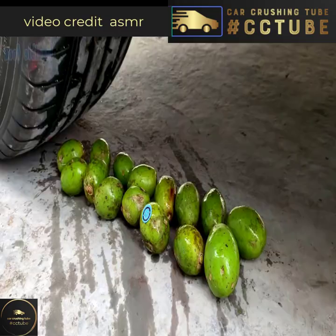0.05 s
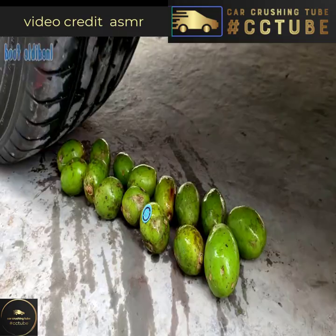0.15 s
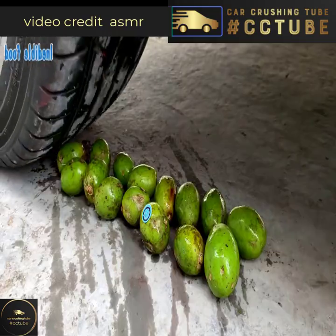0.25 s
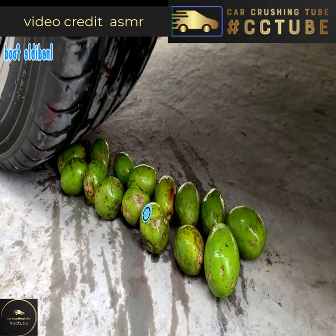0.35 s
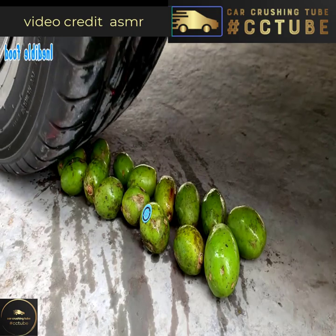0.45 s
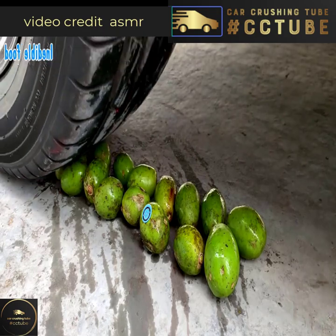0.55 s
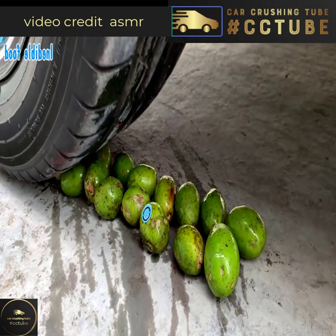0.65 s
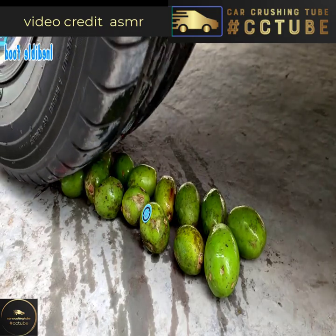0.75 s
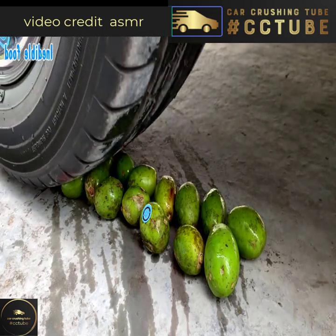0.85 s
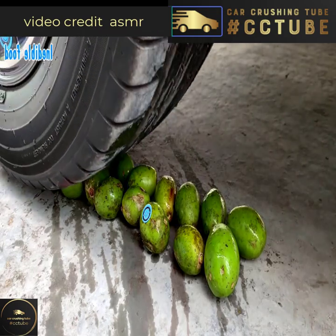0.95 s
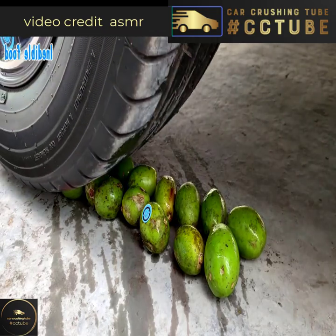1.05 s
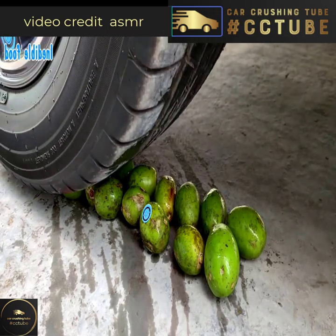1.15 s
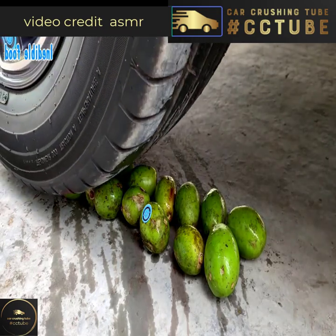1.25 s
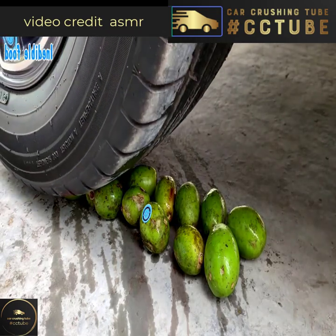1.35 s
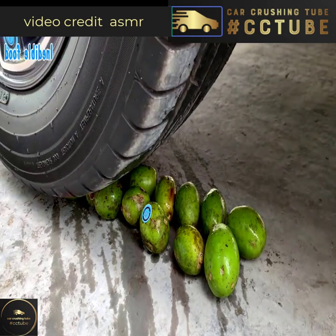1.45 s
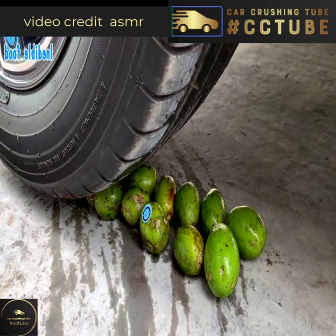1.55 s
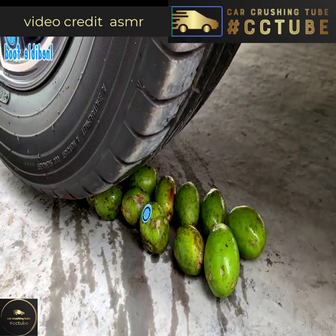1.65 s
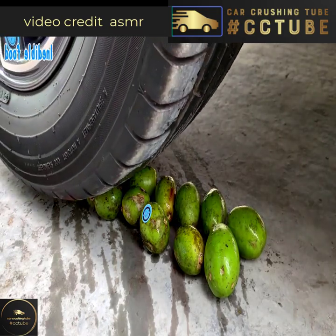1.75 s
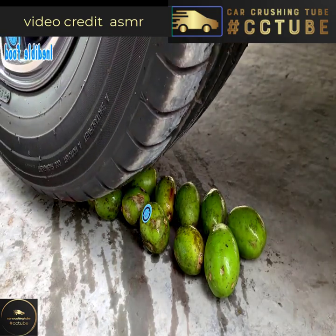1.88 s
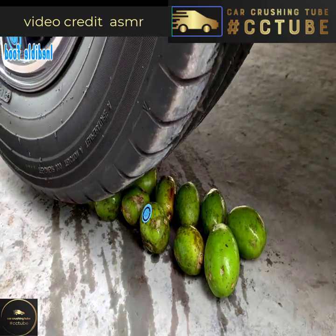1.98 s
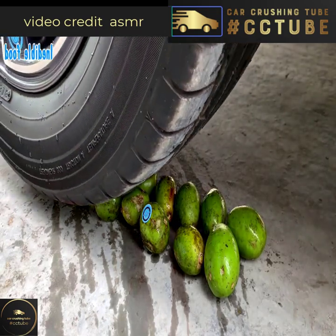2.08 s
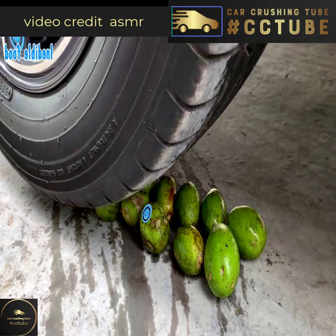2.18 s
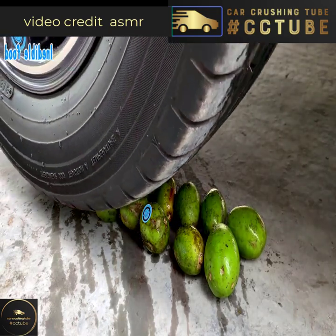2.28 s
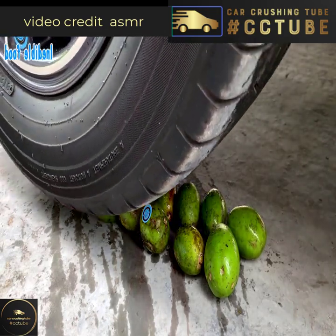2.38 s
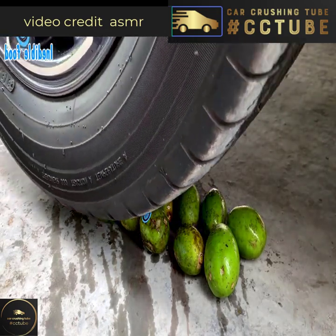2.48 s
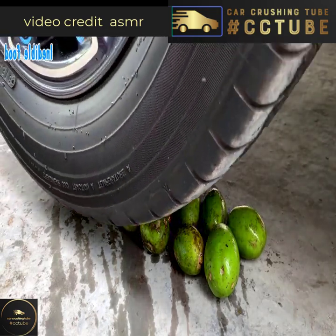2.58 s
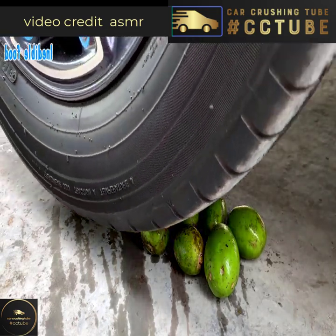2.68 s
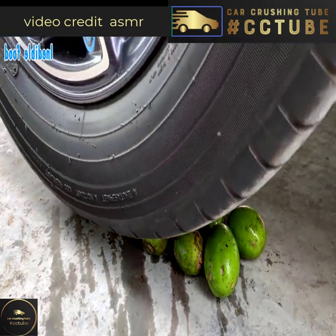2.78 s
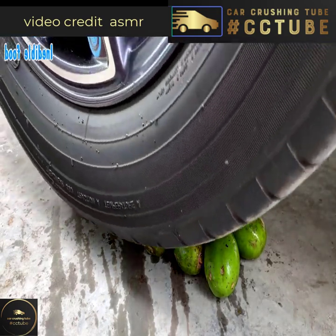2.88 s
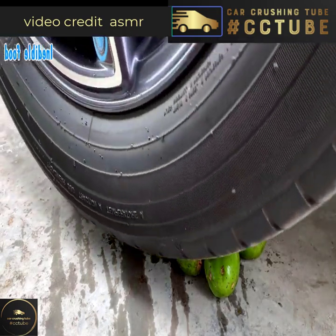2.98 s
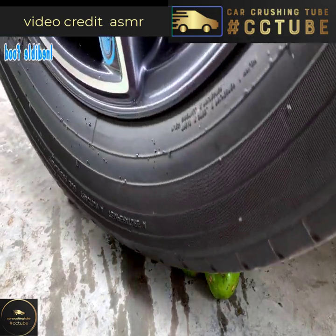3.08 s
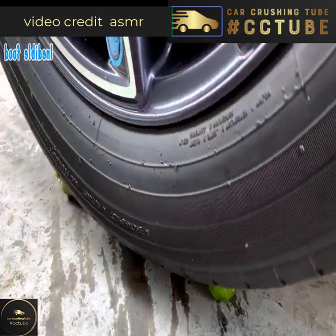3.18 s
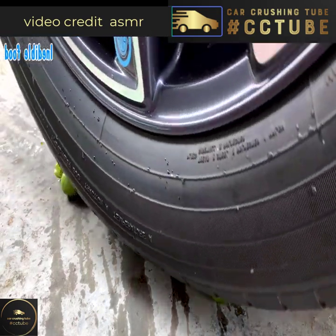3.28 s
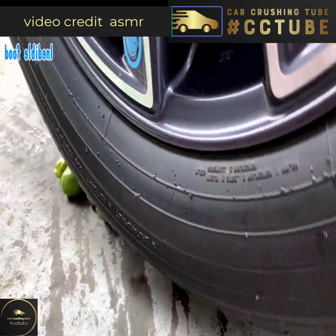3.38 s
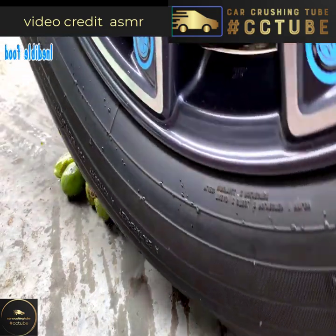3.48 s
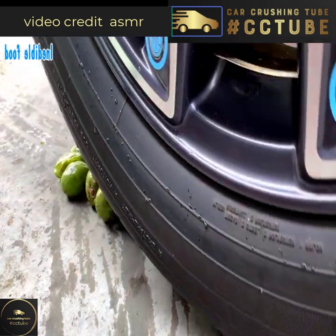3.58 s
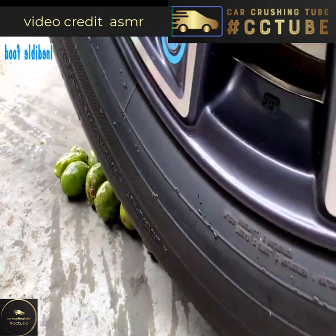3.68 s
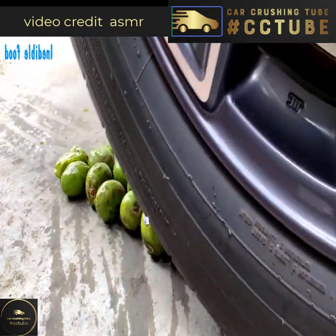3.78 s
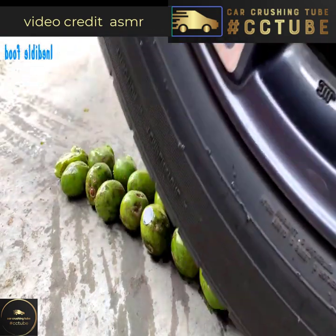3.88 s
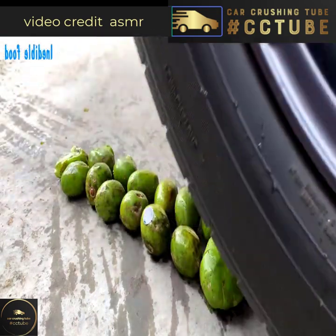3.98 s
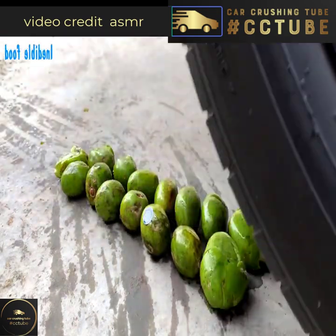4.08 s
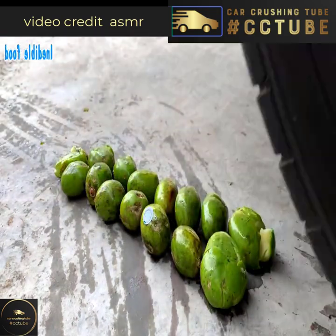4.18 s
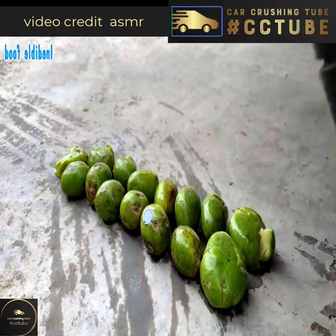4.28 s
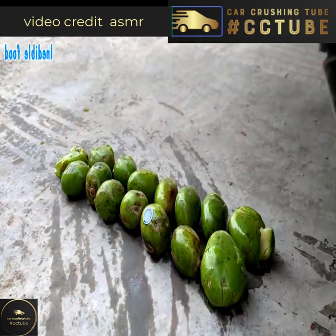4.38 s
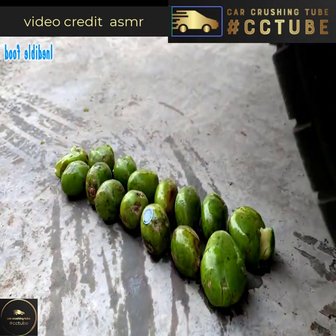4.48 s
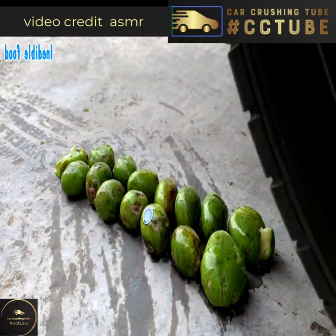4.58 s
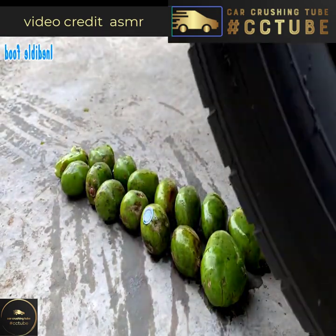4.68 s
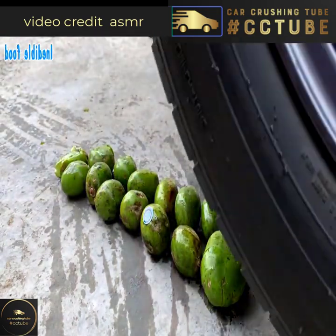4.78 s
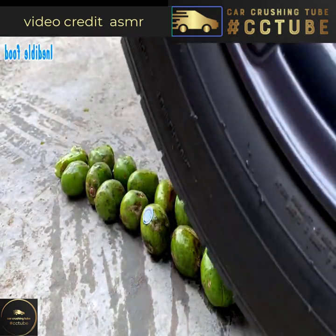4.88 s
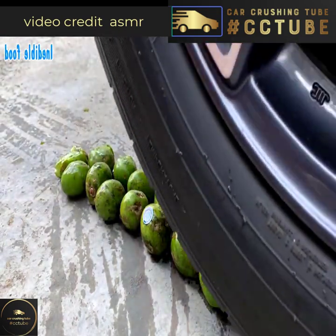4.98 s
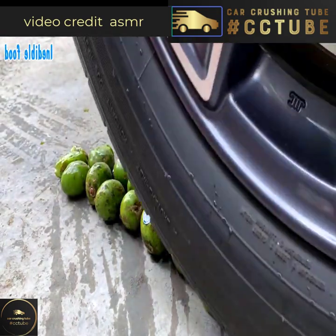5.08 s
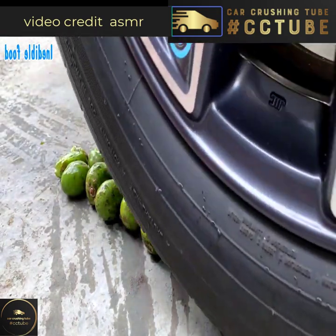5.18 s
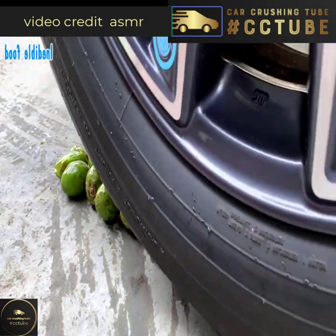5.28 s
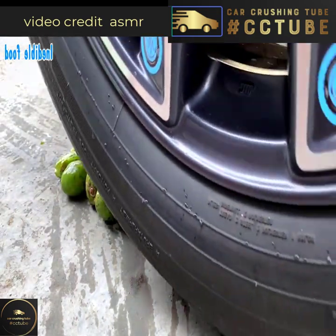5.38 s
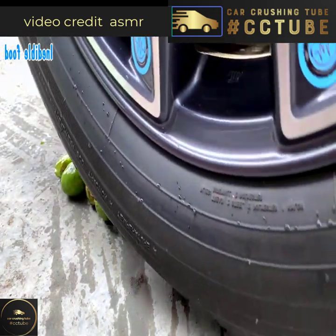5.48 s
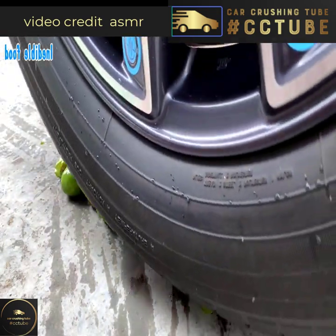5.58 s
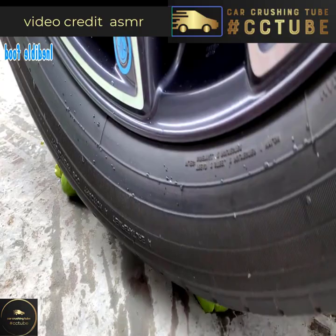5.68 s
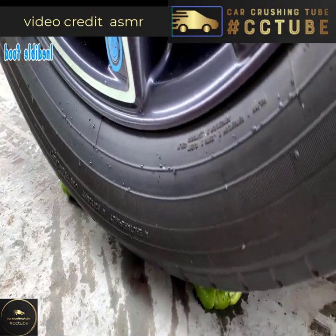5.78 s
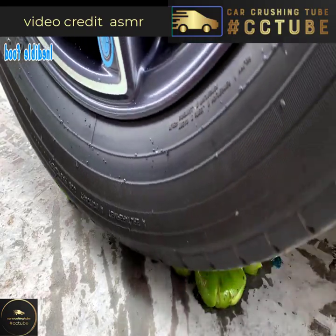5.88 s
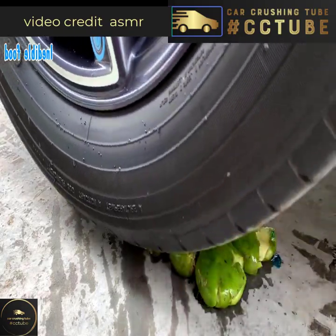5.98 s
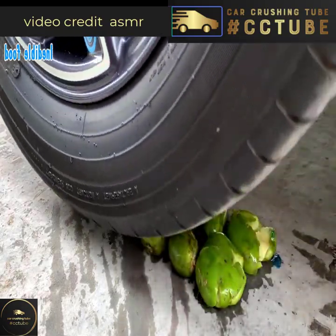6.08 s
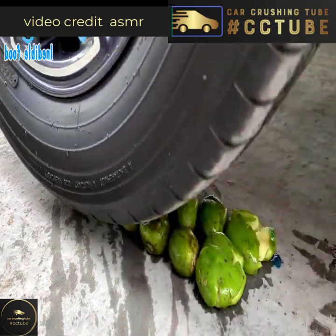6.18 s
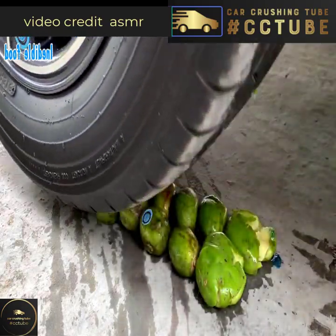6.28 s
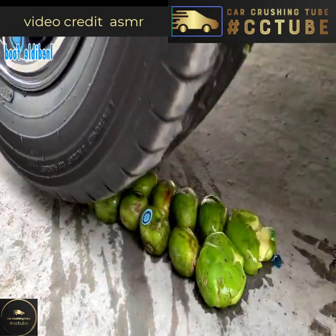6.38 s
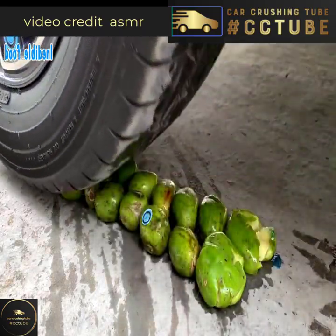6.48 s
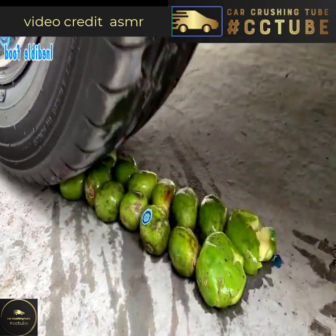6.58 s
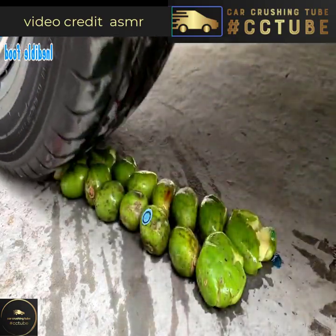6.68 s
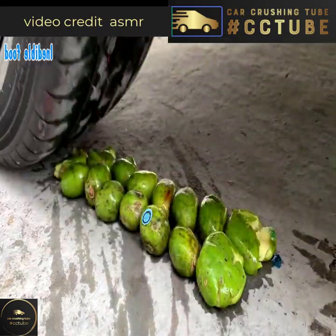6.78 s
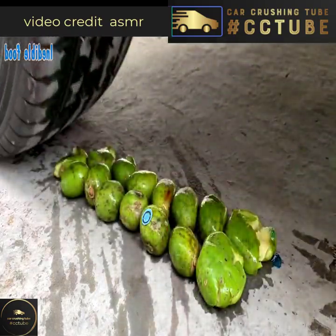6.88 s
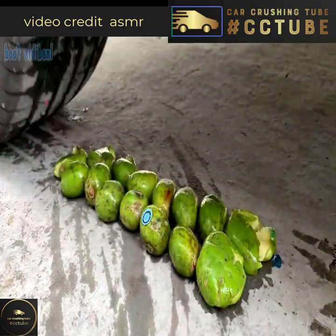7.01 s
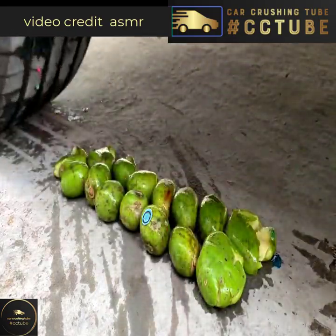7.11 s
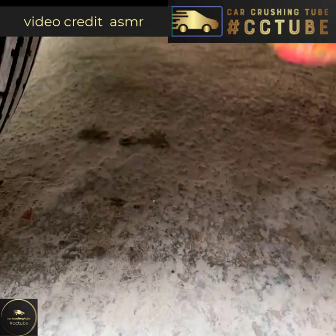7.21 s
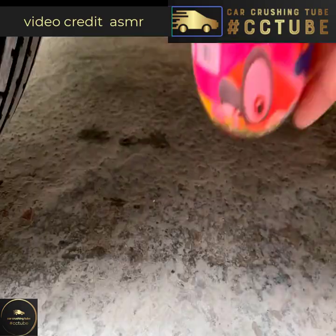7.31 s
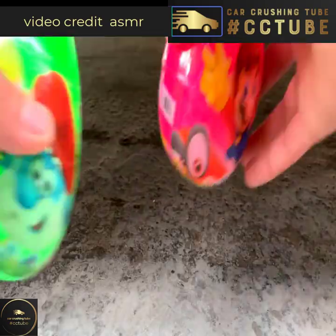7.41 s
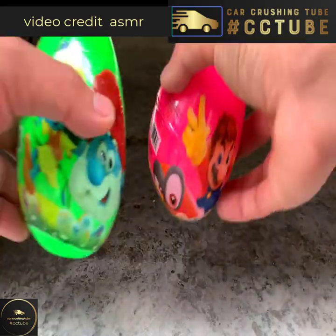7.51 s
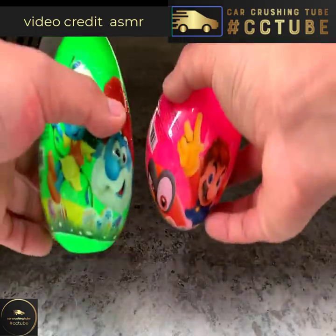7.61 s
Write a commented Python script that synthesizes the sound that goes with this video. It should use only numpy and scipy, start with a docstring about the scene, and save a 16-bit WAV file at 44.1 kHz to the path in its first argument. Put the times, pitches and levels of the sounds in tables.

```python
"""Close to a phone on the ground, a car creeps over a row of hard green fruits on concrete in a carport.
Fruits split with a spit of juice and a pop that falls in pitch; stones clack, pulp crackles, the tyre thumps.
The car halts beyond the row, wet tread squeaking faintly on the way, then backs over the fruits again.
The wheel rings for a moment in that pass; at the end wet rubber scuffs and a thin bright hiss joins.
The engine labours underneath throughout, louder with the throttle; the loudest pops overload the microphone."""
import sys
import numpy as np
from scipy import signal
from scipy.fft import rfft, irfft
from scipy.io import wavfile
from scipy.ndimage import map_coordinates

SR = 44100
rng = np.random.default_rng(int(sys.argv[2]) if len(sys.argv) > 2 else 0)


def transcribe(u):
    """Save the signal u as a 16-bit wav file named by the first command-line argument.

    u: samples, shape (n,) or (channels, n), limited to [-1, 1]; the rate is SR.
    q: integer samples, one column per channel.
    """
    v = np.clip(np.atleast_2d(u).T, -1, 1)
    q = np.round(v * 32767).astype(np.int16)
    wavfile.write(sys.argv[1], SR, q)


N = 337365
TIME = np.arange(N) / SR

# loud splits: start_s, pop_db, pop_hz (scales the falling pitch), ring_cycles,
# glide (extra pitch at the start, as a multiple), spit_db, skin_hz, clack_db (before a trim), clack_hz
LOUD_SPLITS = [(0.477, -5, 844, 1.76, 0.9, -21.5, 8200, -25, 1240),
               (0.5158, -5, 577, 1.8, 2.5, -11, 8560, -13, 1510),
               (0.5426, -13, 880, 1.2, 0.3, -22, 5000.0, -20, 2500),
               (0.6076, -22.5, 1220.0, 2.4, 0.3, -23.5, 3020, -25, 3040),
               (0.6648, -12.5, 680, 1.25, 2.5, -18, 3000.0, -14, 1340),
               (0.6705, -13.5, 915.0, 1.1, 0.3, -23.5, 7000.0, -24, 1910.0),
               (0.73, -8.5, 597, 1.7, 2.5, -17.5, 9900.0, -25, 2240.0),
               (0.7694, -18.5, 1040, 2.2, 0.3, -37.0, 8300.0, -29, 2020),
               (0.8111, -2.5, 1004, 1.9, 0.3, -9.5, 9800, -14, 1810.0),
               (0.8494, -13, 780, 0.92, 2.5, -20.5, 11600.0, -22, 2020),
               (0.9233, -20.5, 1010, 2.8, 0.3, -27.5, 13800.0, -26, 1670),
               (0.9886, -8, 890.0, 1.5, 0.9, -12, 15000, -9, 1700.0),
               (1.0305, -16, 1040.0, 1.9, 0.3, -29.0, 8300.0, -26, 1750.0),
               (1.0561, -16.5, 860.0, 2.1, 0.3, -30, 9800.0, -24, 2080.0),
               (1.2478, -4, 930, 1.5, 0.3, -9.5, 8300.0, -17, 1740),
               (1.2553, -6.5, 522, 1.4, 2.5, -13, 9900.0, -12, 1260.0),
               (1.2786, -6, 797, 2.2, 0.3, -27.0, 9800.0, -24, 2530.0),
               (1.3059, -16.5, 1750, 2.1, 0.3, -20.5, 8050, -24, 2650),
               (1.9218, -17.5, 1060, 3.5, 2.5, -29, 3000.0, -23, 2100.0),
               (1.965, -5.0, 892, 2.9, 0.3, -34, 2500.0, -16, 2100),
               (2.0121, -11, 940, 4.4, 0.3, -26.5, 7000.0, -23, 1290),
               (2.0227, -15.5, 1070, 4.7, 2.5, -25.5, 11600.0, -11, 1560),
               (2.065, -9.5, 876, 2.1, 0.3, -25.5, 3500.0, -17, 1630),
               (2.135, -20, 1020, 3.6, 0.3, -34, 2480, -16.5, 1560),
               (2.2362, 1.5, 550, 1.54, 2.5, -13.5, 13700, -8.5, 1710),
               (2.2524, -11.5, 1750.0, 2.3, 0.3, -40, 2500.0, -25, 2480),
               (2.4816, -13.0, 844, 1.4, 0.3, -28.5, 8450, -22, 1880.0),
               (2.548, -10.5, 840, 3.4, 2.5, -21.0, 8500, -17, 1770),
               (2.626, -3.5, 852.0, 2.7, 2.5, -34, 2500.0, -6.5, 1280),
               (2.6769, -4, 790, 2.7, 2.5, -34, 2500.0, -8, 1580.0),
               (2.7, -5, 820, 2.8, 2.5, -19, 10000.0, -7, 1860),
               (2.7418, -2, 1033, 2.9, 0.3, -19, 10200, -7.5, 2110),
               (2.8861, -3.5, 657.0, 2.15, 2.5, -23.5, 5100.0, -7.5, 1570),
               (2.9425, -11.5, 604, 1.3, 2.5, -26, 8300.0, -28, 2010.0),
               (3.0331, -6.5, 650.0, 2.4, 2.5, -25.0, 8300.0, -7.5, 1240),
               (3.0487, -10, 700, 2.4, 0.9, -21, 2500.0, -13.5, 1950),
               (3.1188, -13.5, 760, 2, 0.3, -28.5, 2930, -24, 1550),
               (3.304, -8, 1000.0, 2, 0.3, -20, 6850, -27, 1450.0),
               (3.314, -7.5, 603.0, 3.1, 0.3, -13, 13800.0, -26, 1430.0),
               (3.3347, -4.5, 570, 2.5, 2.5, -22, 5900.0, -15, 1400.0),
               (3.3413, -10.5, 1160.0, 3.1, 0.3, -26, 13800.0, -21, 1570.0),
               (3.3458, -12.0, 1160, 2.0, 0.3, -26, 6000.0, -30, 2330.0),
               (3.378, -6.5, 700, 3.5, 2.5, -14.5, 6340, -13, 1240),
               (3.3874, -12, 580.0, 2.2, 0.3, -28, 5900.0, -28, 1640.0),
               (3.4096, -11.5, 620.0, 2.4, 2.5, -35, 7000.0, -21, 1240),
               (3.4424, -4, 774, 1.9, 2.5, -17, 13800.0, -11, 1390.0),
               (3.4494, -8, 690, 2.7, 0.3, -11.5, 13800.0, -11, 1390.0),
               (3.4535, -9.0, 900.0, 2.0, 0.9, -24, 6040, -15, 1260.0),
               (3.5031, -6, 570, 2.3, 2.5, -10.5, 10100, -12, 2450.0),
               (3.509, -14, 540.0, 1.4, 0.3, -25, 3500.0, -12, 1530.0),
               (3.523, -1.5, 840, 2.2, 1.6, -22, 6900.0, -17, 1280),
               (3.5433, -3, 760, 1.8, 1.6, -19.0, 3000.0, -8, 1260.0),
               (3.5549, -3.5, 1460, 3.9, 0.3, -15.0, 2500.0, -19, 1950.0),
               (3.561, -11, 1180, 3.1, 0.3, -17, 13800.0, -19, 1610.0),
               (3.5668, -3.5, 774, 2, 2.5, -17.5, 6750, -7, 1260.0),
               (3.6043, -17, 940, 3.3, 1.6, -17, 6600, -15, 1270.0),
               (3.614, -2.5, 960, 1.2, 0.3, -16.5, 13800.0, -19, 1270.0),
               (3.6335, -11, 1110, 1.4, 0.3, -16.5, 3620, -30, 2520.0),
               (3.6428, -7.5, 610.0, 3.0, 2.5, -13.5, 14100.0, -7, 1280.0),
               (3.6857, -19, 1590, 6, 0.3, -30.0, 3030, -28, 3100.0),
               (5.24, -7.0, 1175, 3.2, 0.3, -25, 3030, -22, 1840),
               (5.335, -8, 1243, 4.2, 0.3, -21.5, 2500.0, -27, 2170),
               (5.3751, -11.5, 1030.0, 2.6, 0.9, -34, 3000.0, -19, 1560.0),
               (5.4183, -11, 785.0, 2.5, 1.6, -26, 2480, -31, 1510.0),
               (5.4387, -6, 930, 2.3, 0.9, -23.5, 4000.0, -11, 1250),
               (5.4535, -12.5, 940, 1.8, 0.3, -31.0, 3500.0, -27, 1290.0),
               (5.4838, -7, 625, 1.9, 1.6, -18.5, 3540, -15, 1240),
               (5.5388, -13, 950.0, 2.5, 0.3, -20.5, 7000.0, -30, 1320.0),
               (5.5541, -8.5, 955, 3.7, 0.3, -17.5, 3670, -19, 3260),
               (5.5996, -6, 860, 4.9, 1.6, -15, 3670, -15, 1370),
               (5.6041, -6.0, 843, 2.1, 0.9, -17.0, 10000.0, -18, 1290),
               (5.6626, -11.0, 1063, 2.4, 0.3, -28, 9900.0, -26, 1730.0),
               (5.7544, -22, 960, 3.8, 0.3, -32.0, 4960, -30, 1690.0),
               (5.8553, 1, 955, 2.76, 0.9, -17, 3500.0, -9, 1360),
               (5.9916, -17.5, 874, 3.2, 2.5, -17.5, 3280, -21, 3130.0),
               (6.079, -7.5, 967, 2.7, 1.6, -16.5, 2380, -11, 1980),
               (6.0913, -8, 950, 2.1, 0.3, -22, 8300.0, -11, 1660),
               (6.1175, -16.5, 584.0, 1.2, 2.5, -29, 13800.0, -27, 1810.0),
               (6.2028, -13.5, 1290.0, 1.65, 1.6, -22, 2500.0, -18, 1900),
               (6.2755, -0.5, 910, 3.7, 2.5, -12.5, 4070, -12, 1270),
               (6.292, -20, 990, 3.0, 0.3, -38, 2500.0, -17, 1860.0),
               (6.3412, -5, 1006, 1.94, 2.5, -24, 2500.0, -10, 1570)]
# skin snapping without a pop: peak_s, level_db, skin_hz
SKIN_TEARS = [(0.4175, -26, 9500), (.447, -25.5, 9700), (0.6446, -12.5, 4650), (0.7352, -21, 8400),
              (0.813, -23, 8700), (0.8327, -27, 8300), (2.2336, -25.5, 4830), (2.353, -22.5, 4030),
              (2.367, -21.5, 11700), (2.4353, -27, 9800), (2.9677, -27, 13960), (3.0005, -19, 8000),
              (3.212, -24.5, 9700), (3.873, -35.5, 4200), (5.1186, -36, 3480), (5.21, -23.5, 3070),
              (5.2338, -24, 3470), (5.742, -28.5, 9800), (5.9764, -24.5, 11600)]
# tearing skin, relative response: pitch_hz, level_db
SKIN_COLOUR = [(500, 0.5), (1500, 8), (2500, 0), (3500, 3), (5000, 1), (7000, -3.5), (9000, 0), (13500, -3),
               (15000, -11), (16000, -26)]
# fibres parting, relative response: pitch_hz, level_db
FIBRE_COLOUR = [(200, -25), (400, -4), (900, 4.5), (1400, -6), (2200, -7.5), (4000, -13), (8000, -17)]
# juice, relative response: pitch_hz, level_db
JUICE_COLOUR = [(500, 9.5), (1200, 8), (2200, 0.5), (3500, 2), (5000, -2), (7000, 0), (9000, 3.5),
                (13500, 4.5), (15000, -1), (16000, -12)]
# flesh giving way, relative response: pitch_hz, level_db
PULP_COLOUR = [(150, -6), (300, 10.5), (450, 7), (850, 7.5), (1300, -31), (2200, -23), (4000, -7),
               (8000, -94)]
# pressure on the pulp, one list rolling forward and one backing up: time_s, crackle_db
PULP_PRESSURE = [
    [(.43, -37), (.55, -36.5), (1, -36.5), (1.6, -45), (2.05, -38.5), (2.8, -41), (3, -33.5), (3.27, -38.5),
     (3.4, -30.5), (3.66, -34.5)],
    [(5.11, -39), (5.2, -37), (5.6, -41), (5.8, -42), (6.5, -39)],
]
# tread grinding split flesh, strongest as the forward roll ends, again in bursts when backing up:
# time_s, level_db
MASH_LEVEL = [(1.8, -75), (2, -47), (2.15, -64), (2.3, -59), (2.6, -50), (2.75, -77), (3, -52), (3.25, -48),
              (3.33, -37), (3.57, -35), (3.66, -29), (3.72, -70), (5.05, -76), (5.12, -34.5), (5.24, -37),
              (5.35, -35.5), (5.5, -66), (5.62, -34), (5.72, -50), (6.3, -44), (6.55, -52), (6.7, -73)]
# ground flesh, relative response: pitch_hz, level_db
GROUND_COLOUR = [(400, 4), (1100, 7.5), (1700, -3), (2700, -3.5), (3700, 2.5), (5000, -3.5), (9000, -7),
                 (16000, -32)]
# soft scuffs as the tread leaves the last fruit: centre_s, level_db, half_length_s
TREAD_SCUFFS = [(6.695, -49, 0.011), (6.727, -39.5, 0.02)]
# tyre drops as a whole fruit gives way: start_s, knock_db, cavity_ring_db
TYRE_DROPS = [(.518, -24, -18), (.55, -33, -14), (.582, -33.5, -19), (.819, -22.5, -21.5),
              (1.257, -21.5, -24.5), (2.236, -19.5, -21), (3.337, -23, -23.5), (3.505, -22, -20.5),
              (3.647, -30, -23)]
# modes of the tyre carcass: pitch_hz, level_db, t60_s
CARCASS_MODES = [(75, 4.5, 0.028), (142, 0, 0.098), (312, 2.5, 0.02), (417.7, 8.5, 0.062), (847, -2, 0.12),
                 (1016, -6.5, 0.088)]
# modes of the air inside the tyre: pitch_hz, level_db, t60_s
CAVITY_MODES = [(166, -7, 0.05), (197.2, -2.5, 0.52), (226.3, -0.5, 0.13), (256, -14, 0.045)]
# wet tread squeaking as it rolls clear: centre_s, half_length_s, pitch_hz, level_db
TREAD_SQUEAKS = [(3.83, 0.077, 6050, -62), (3.968, 0.1, 6360, -63), (4.058, 0.18, 4000, -61),
                 (4.07, .08, 5030, -69)]
# engine speed, highest in the forward push, falling as the throttle eases, with quick jumps up:
# time_s, firings_hz
FIRING_RATE = [(0, 22.9), (.7, 23.2), (1.3, 22.9), (1.72, 22.2), (1.88, 23.5), (3.3, 23.5), (3.8, 22.1),
               (4.15, 21.6), (4.38, 20.3), (4.46, 22.9), (4.9, 22.5), (5.9, 21.3), (6.5, 20.3), (7.1, 19.5),
               (7.65, 20)]
# throttle, one push forward and one back: time_s, exhaust_db
THROTTLE = [(0, -38.5), (.2, -29), (.55, -25), (1.7, -26), (2.2, -23.5), (3.4, -24.5), (4.35, -35.5),
            (5.1, -25), (5.8, -27.5), (6.5, -29), (7.05, -38), (7.65, -37)]
# strong orders at a crawl, each swelling as it meets its resonance under the car:
# order, level_db, growth_db_per_db of effort, boom_hz, boom_width_hz, boom_lift_db
STRONG_ORDERS = [(1, -33.5, 1, 22.6, 1.9, 0.5), (3, -41.5, 0.86, 69.6, 5.7, 7.5),
                 (5, -35.5, 1, 106.15, 5.7, 8.5)]
# weaker orders through the car's resonances, relative to the mean of the strong three: pitch_hz, level_db
WEAK_ORDERS = [(45, -5), (90, -7.5), (125, -7), (155, -13), (180, -14.5), (205, -10), (235, -21.5),
               (290, -25.5), (335, -23), (385, -19), (470, -33), (555, -24.5), (620, -44), (720, -30),
               (850, -37)]
# engine bay rumble, relative response: pitch_hz, level_db
RUMBLE_COLOUR = [(25, -2.5), (60, 6.5), (120, 5), (200, 0), (290, -9.5), (390, -10.5), (600, -17.5),
                 (800, -36), (1200, -48.5)]
# engine bay hiss, relative response: pitch_hz, level_db
HISS_COLOUR = [(300, 10), (800, 3.5), (1300, -3), (2050, -1.5), (3000, -5.5), (4000, -7.5), (5500, -14),
               (7200, -17), (9000, -12), (13500, -15), (15000, -38)]
# faint engine whine, clearest before the backward pass and at the end: time_s, pitch_hz, level_db
ENGINE_WHINE = [(3.7, 554, -69), (4.8, 563, -56), (6.6, 544, -65), (7.1, 590, -62), (7.5, 602, -58)]
# lag of the left microphone: time_s, lag_samples
LEFT_LAG = [(0, 0), (2.5, 2), (3.5, -6), (5.2, -4.5), (6, 3.5), (7.65, -7)]

LEAD_S = .012  # strain and tearing swell this long before a break
# a split may run on as a weaker crack: chance, mean wait, level below the split, scatter of level and pitch
RUN_ON_SHARE, RUN_ON_S, RUN_ON_DB, RUN_ON_SCATTER_DB, RUN_ON_OCTAVES = 0.57, 0.012, -14.5, 2, 0.37
# every split jolts the tyre, the more the deeper its pop: knock against a pop at JOLT_HZ, ring against knock
JOLT_DB, JOLT_HZ, JOLT_DB_PER_OCTAVE, JOLT_RING_DB = -23, 835, -11.5, -6.5
BITE_DB_PER_S, RELEASE_DB_PER_S = 228, 255  # the tread meets and leaves the fruits
OOZE_DB, OOZE_S = -20.5, 0.034  # crackle after a split: level against its spit, decay
GRIT_DB = -55  # grit on bare concrete, as a crackle level
# grit and hiss fall away round the halt for the gear change
HALT_AT_S, HALT_S, HALT_GRIT_DB, HALT_HISS_DB = 4.5, 0.4, -22, -3.5
CRAWL_DB = -28  # exhaust level at a steady crawl
RIM_AT_S, RIM_UNTIL_S, RIM_HZ, RIM_DB, RIM_T60_S = 5.486, 5.79, 758, -34, 3.5
BRIGHT_AT_S, BRIGHT_HZ, BRIGHT_WIDTH_HZ, BRIGHT_DB = 7.26, 8730, 2400, -64
ECHO_S = 0.011  # the underbody throws the crushing back
TOP_HZ = 15600


def splits(stone_db=-3, fibre_db=-20, strain_s=0.0048, fibre_s=0.0065, pan_db=-0.05):
    """Fibres strain and part, the skin tears with a brief spit and the fruit pops open."""
    pops, fibre_power = np.zeros((2, N))
    skin = np.zeros((2, N))
    for s, db, hz, cycles, glide, skin_db, skin_hz, clack_db, clack_hz in cracks():
        popped = undb(db) * pop(hz, cycles, glide, rng.standard_normal())
        clack = undb(clack_db + stone_db) * snap(clack_hz)
        add(pops, s, popped + clack)
        add(fibre_power, s - LEAD_S, (undb(db + fibre_db) * burst(strain_s, fibre_s)) ** 2)
        add(skin, s - LEAD_S, undb(skin_db) * spit(skin_hz))
    for s, db, hz in SKIN_TEARS:
        add(skin, s - LEAD_S, undb(db) * spit(hz))
    body = pops + colour(pair(0.98), FIBRE_COLOUR) * np.sqrt(fibre_power)
    return body * undb([[pan_db], [-pan_db]]) + skin


def cracks():
    """The loud splits and the weaker cracks that run on from some of them."""
    rows = list(LOUD_SPLITS)
    chances = rng.random((len(LOUD_SPLITS), 2))
    scatters = rng.standard_normal((len(LOUD_SPLITS), 2))
    for row, (luck, wait), (size, tone) in zip(LOUD_SPLITS, chances, scatters):
        s, db, hz, cycles, glide, skin_db, skin_hz, clack_db, clack_hz = row
        weaker_db = RUN_ON_DB + RUN_ON_SCATTER_DB * size
        shift = 2 ** (RUN_ON_OCTAVES * tone)
        if luck < RUN_ON_SHARE:
            rows.append((s + 2 * RUN_ON_S * wait, db + weaker_db, hz * shift, cycles, glide,
                         skin_db + weaker_db, skin_hz, clack_db + weaker_db, clack_hz * shift))
    return rows


def pop(hz, cycles, glide, chance, open_s=0.00048, sag_s=0.0058, rise_s=0.00073,
        ragged=0.13, shiver_db=-15, shiver_s=0.0045):
    """The air in a crack rings for a few cycles, falling as the ragged gap springs open; the flesh shivers."""
    t = TIME[:1100]
    rough = signal.sosfilt(signal.butter(2, 900, fs=SR, output="sos"), rng.standard_normal(len(t)))
    sag = .6 + .4 * np.exp(-t / sag_s)
    pitch = hz * (glide * np.exp(-t / open_s) + sag)
    turns = np.cumsum(pitch * np.exp(ragged * unit(rough))) / SR
    rise = 1 - np.exp(-t / rise_s)
    shape = rise * np.exp(-(turns / cycles) ** 2)
    # a few short-lived resonances, new for each pop
    modes_hz = hz * np.exp(rng.uniform(-0.635, 0.88, size=(6, 1)))
    modes = np.sin(2 * np.pi * modes_hz * t + rng.uniform(0, 2 * np.pi, size=(6, 1)))
    shiver = (np.sqrt(hz / modes_hz) * modes).sum(0) / 2
    shiver *= rise * np.exp(-t / shiver_s)
    # pressure may start either way
    return np.sign(chance) * np.sin(2 * np.pi * turns) * shape / shape.max() + undb(shiver_db) * shiver


def snap(hz, snap_s=0.0022, second_db=-6, low_octaves=-0.33, high_octaves=0.776):
    """The hard stone clacks in a short woody mode of its own and two weaker ones near it."""
    t = TIME[:1100]
    modes_hz = hz * 2 ** rng.uniform(low_octaves, high_octaves, size=(2, 1))
    others = (rng.standard_normal((2, 1)) * np.sin(2 * np.pi * modes_hz * t)).sum(0) / np.sqrt(2)
    return (np.sin(2 * np.pi * hz * t) + undb(second_db) * others) * np.exp(-t / snap_s)


def spit(hz, ring_db=10, ring_q=4, lead_s=0.00074, spit_s=0.0017, drip_db=-18, drip_s=0.0074, splinter_db=5):
    """The skin tears in tiny splinters that ring the torn flap at its own pitch; droplets trail after."""
    envelope = burst(lead_s, spit_s) + undb(drip_db) * burst(lead_s, drip_s)
    size = len(envelope)
    splinters = pair(-0.5, size) * undb(splinter_db * rng.standard_normal(size)) * envelope
    flap = band(splinters, min(hz, SR / 3), hz / ring_q)
    torn = colour(splinters + undb(ring_db) * flap, SKIN_COLOUR)[:, :size]
    return unit(torn) * np.sqrt(np.mean(envelope ** 2))


def burst(lead_s, fall_s):
    """An envelope that swells up to the moment of a break, LEAD_S in, and dies away."""
    t = TIME[:3000] - LEAD_S
    return np.exp(np.minimum(t / lead_s, -t / fall_s))


def crackle(fizz_db=-7, seep_db=-10, pulp_db=-4, squish_db=-6, squash=2.0):
    """Cells burst under the tread, each band at its own pitch; the wet flesh grows fastest with the load."""
    load_db = load()
    cells = sum(band(grains(150, 4.0, -7), hz, hz / 3) for hz in np.geomspace(900, 14000, num=12))
    # each cell sputters for a moment as it empties
    sputter = rng.standard_normal((1, 400)) * np.exp(-TIME[:400] / .0009)
    cells = signal.oaconvolve(cells, sputter, axes=1)[:, :N]
    flicker_db = 2.2 * walk(70)
    fizz = colour(unit(cells), JUICE_COLOUR) * undb(load_db + fizz_db + flicker_db)
    pulp = colour(grains(400, 3.5, -9), PULP_COLOUR)
    bubbles = unit(sum(band(grains(45, 3.5, -8), hz, hz / 9) / hz for hz in np.geomspace(650, 2300, num=9)))
    flesh_db = squash * (load_db + 40.5) - 47.0 + 2 * walk(50)
    flesh = (undb(pulp_db) * pulp + undb(squish_db) * bubbles) * undb(flesh_db)
    return fizz + juice(undb(load_db + seep_db), patchy_db=11.5) + flesh


def load():
    """Crackle level in dB: grit while rolling, pulp under the tread, and a surge after every loud split."""
    power = undb(GRIT_DB + HALT_GRIT_DB * halt()) ** 2
    for crossing in PULP_PRESSURE:
        db = curves(crossing)[0]
        before = np.maximum(crossing[0][0] - TIME, 0)
        after = np.maximum(TIME - crossing[-1][0], 0)
        power = power + undb(db - BITE_DB_PER_S * before - RELEASE_DB_PER_S * after) ** 2
    surge = np.exp(-TIME[:SR // 2] / OOZE_S)
    for s, _, _, _, _, spit_db, *_ in LOUD_SPLITS:
        add(power, s, (undb(spit_db + OOZE_DB) * surge) ** 2)
    return 10 * np.log10(power)


def halt():
    """A bell over time, 1 at the middle of the halt between the passes and near 0 far from it."""
    return np.exp(-((TIME - HALT_AT_S) / HALT_S) ** 2)


def juice(envelope, side_db=-4, patchy_db=8.5):
    """Noise of seeping juice and droplets: treble bands sputter partly together, partly each on its own."""
    together = walk(330)
    spray = np.zeros((2, N))
    for hz in np.geomspace(1000, 13000, num=7):
        sputter_db = patchy_db * np.minimum(.7 * together + .6 * walk(330), 2)
        spray += band(pair(side_db), hz, hz / 2) * undb(sputter_db)
    return colour(unit(spray), JUICE_COLOUR) * envelope


def mash(flicker_db=2.5):
    """Split flesh is ground into the concrete: a close, fine, duller crackle."""
    fibres = colour(grains(1000, 3.3, -3), GROUND_COLOUR)
    return fibres * undb(curves(MASH_LEVEL)[0] + flicker_db * walk(90))


def scuffs():
    """Wet rubber brushes off the last fruit in short swells of patchy noise."""
    swells = sum(undb(db) * np.exp(-((TIME - s) / half_s) ** 2) for s, db, half_s in TREAD_SCUFFS)
    return juice(swells, patchy_db=6)


def tyre():
    """Each drop knocks the carcass and rings the air inside it; each loud split jolts both as well."""
    out, blows = np.zeros(N), list(TYRE_DROPS)
    for s, db, hz, *_ in LOUD_SPLITS:
        knock_db = db + JOLT_DB + JOLT_DB_PER_OCTAVE * np.log2(hz / JOLT_HZ)
        blows.append((s, knock_db, knock_db + JOLT_RING_DB))
    for (s, knock_db, ring_db), chance in zip(blows, rng.standard_normal(len(blows))):
        knock = undb(knock_db) * ring(CARCASS_MODES, 1 + 0.0974 * chance)
        cavity = undb(ring_db) * ring(CAVITY_MODES, 1 + 0.026 * chance)
        add(out, s, knock + cavity)
    return out


def ring(modes, detune):
    """Struck modes, slightly out of tune on each blow."""
    t = TIME[:SR // 2]
    hz, db, t60 = np.transpose(modes)[:, :, None]
    rise = 1 - np.exp(-t / 0.00048)
    return (undb(db - 60 * t / t60) * np.sin(2 * np.pi * hz * detune * t)).sum(0) * rise


def rim():
    """The wheel rings on a single note, dying slowly until it is damped."""
    since = np.maximum(TIME - RIM_AT_S, 0)
    damped = np.clip((RIM_UNTIL_S - TIME) * 20, 0, 1)
    return undb(RIM_DB - 60 * since / RIM_T60_S) * damped * np.sin(2 * np.pi * RIM_HZ * since)


def squeak(flutter_db=2.5, waver=.008, hoarse=.03):
    """Wet rubber slips on the concrete in a few hoarse, wavering tones."""
    out = np.zeros(N)
    for s, half_s, hz, db in TREAD_SQUEAKS:
        phase = 2 * np.pi * np.cumsum(hz * (1 + waver * walk(15) + hoarse * walk(530))) / SR
        out += undb(db + flutter_db * walk(200)) * np.exp(-((TIME - s) / half_s) ** 2) * np.sin(phase)
    return out


def engine(scatter_rad=0.0306):
    """One exhaust thud per firing, built from its orders; echoes under the car scatter the higher ones."""
    hz, push_db = curves(FIRING_RATE)[0], effort()
    turn = 2 * np.pi * np.cumsum(hz * (1 + .002 * walk(8))) / SR
    strong = {}
    for order, db, growth, boom_hz, width_hz, lift_db in STRONG_ORDERS:
        boom_db = lift_db / (1 + (2 * (order * hz - boom_hz) / width_hz) ** 2)
        strong[order] = db + growth * push_db + boom_db
    mean_db = sum(strong.values()) / len(strong)
    thuds = np.zeros(N)
    for k in range(1, 38):
        db = strong[k] if k in strong else mean_db + np.interp(k * hz, *np.transpose(WEAK_ORDERS))
        lateness = scatter_rad * k ** 2 * rng.uniform(0.584, 2.028)
        thuds -= undb(db + 1.5 * walk(7)) * np.cos(k * turn - lateness)
    return np.sqrt(2) * thuds, turn


def effort():
    """Throttle in dB above a steady crawl."""
    return curves(THROTTLE)[0] - CRAWL_DB


def bay(turn, rumble_db=-36.5, rumble_growth=0.47, hiss_db=-43.5, hiss_growth=0.48, tick_depth=0.061):
    """Rumble and hiss from under the bonnet pulse with the firings; part of the hiss arrives later at right."""
    push_db = effort()
    low_db = rumble_db + rumble_growth * push_db + 1.2 * walk(12)
    rumble = colour(pair(-12.5), RUMBLE_COLOUR) * undb(low_db) * (1 + 0.2 * np.cos(turn))
    left, right = pair(-1.2)
    air = np.array([left, np.roll(right, 19)])  # samples
    high_db = hiss_db + hiss_growth * push_db + HALT_HISS_DB * halt() + .5 * walk(40)
    hiss = colour(unit(air + pair(2.5)), HISS_COLOUR) * undb(high_db)
    return rumble + hiss * (1 + tick_depth * np.cos(turn))


def whine():
    """A thin, wavering tone from the engine bay drifts in pitch and level."""
    hz, db = curves(ENGINE_WHINE)
    phase = 2 * np.pi * np.cumsum(hz * (1 + .003 * walk(9))) / SR
    return undb(db + 2 * walk(10)) * np.sin(phase)


def bright_hiss():
    """Twice-filtered narrow noise: a thin, high hiss joins near the end."""
    thin = band(band(pair(-2), BRIGHT_HZ, BRIGHT_WIDTH_HZ), BRIGHT_HZ, BRIGHT_WIDTH_HZ)
    return unit(thin) * undb(BRIGHT_DB) * np.clip((TIME - BRIGHT_AT_S) * 20, 0, 1)


def ports(x, lift_db=-5, lift_hz=2100, lift_width_hz=1500, air_db=-14):
    """The crushing point moves past two microphones; the left has more presence, the right more top."""
    lag = curves(LEFT_LAG)[0]
    left = map_coordinates(x[0], [np.arange(N) - lag], order=3)
    presence = band(left, lift_hz, lift_width_hz)
    top = band(x[1], 9000, 5000)
    return np.array([left + undb(lift_db) * presence, x[1] + undb(air_db) * top])


def carport(x, near_db=-13, near_t60=0.042, far_db=-19, far_t60=0.38, echo_db=-21):
    """Quick echoes between floor, tyre and underbody, then a faint tail from the walls."""
    t = TIME[:SR * 2 // 3]
    early = pair(-5, len(t))
    near = early * undb(-60 * t / near_t60) * (t > .001) * (rng.random(len(t)) < 900 / SR)
    far = pair(-1.1, len(t)) * undb(-60 * t / far_t60) * (t > .012)
    h = undb(near_db) * near / np.linalg.norm(near) + undb(far_db) * far / np.linalg.norm(far)
    h *= np.sqrt(2)  # the norms span both channels
    h[:, int(ECHO_S * SR)] += undb(echo_db)
    soft = signal.sosfilt(signal.butter(1, 5000, fs=SR, output="sos"), x.mean(0))
    return x + signal.oaconvolve(soft[None], h, axes=1)[:, :N]


def undb(db):
    """Decibels to gain."""
    return 10 ** (np.asarray(db) / 20)


def unit(x):
    """Scale to rms 1."""
    return x / np.sqrt(np.mean(x ** 2))


def curves(table):
    """The columns of a table, joined by lines over time."""
    s, *columns = np.transpose(table)
    return [np.interp(TIME, s, c) for c in columns]


def colour(x, points):
    """Causal minimum-phase filter with the given (Hz, dB) response, scaled to unit power gain."""
    hz, db = np.transpose(points)
    size = 4096
    f = np.maximum(np.fft.rfftfreq(size, 1 / SR), 1)
    cepstrum = irfft(np.log(undb(np.interp(np.log(f), np.log(hz), db))))
    # fold the cepstrum forward in time
    cepstrum[1:size // 2] *= 2
    cepstrum[size // 2 + 1:] = 0
    h = irfft(np.exp(rfft(cepstrum)))
    return signal.oaconvolve(np.atleast_2d(x), h[None] / np.linalg.norm(h), axes=1)[:, :N]


def band(x, hz, width):
    """One resonance, gain 1 at its centre."""
    return signal.lfilter(*signal.iirpeak(hz, hz / width, fs=SR), x)


def pair(side_db, size=N):
    """White noise for two channels, partly alike; side_db is the side against the mid."""
    mid, side = rng.standard_normal((2, size))
    side = side * undb(side_db)
    return np.array([mid + side, mid - side]) / np.sqrt(1 + undb(side_db) ** 2)


def grains(rate, spread_db, side_db):
    """Sparse clicks, rate per second, a few of them much larger than the rest; power 1."""
    size = undb(spread_db * np.minimum(rng.standard_exponential(N), 4))
    return unit((rng.random(N) < rate / SR) * size * pair(side_db))


def walk(rate):
    """Random wander through rate knots per second, with a spread near 1."""
    knots = rng.standard_normal(4096)
    return 1.2 * np.interp(TIME * rate, np.arange(len(knots)), knots)


def add(out, s, x):
    """Mix a short sound in at time s."""
    i = max(int(s * SR), 0)
    out[..., i:i + x.shape[-1]] += x[..., :max(N - i, 0)]


def scene():
    """Crushing close by, the engine behind it and a little to the right."""
    thuds, turn = engine()
    crushing = carport(ports(splits() + crackle() + mash() + scuffs()))
    wheel = tyre() + rim() + squeak()
    exhaust = thuds * undb([[-.6], [.6]])
    return crushing + wheel + exhaust + bay(turn) + whine() + bright_hiss()


def record(dry, notch_hz=11350, notch_q=5, ceiling=.48, hardness=5):
    """The microphone port swallows a narrow treble band, loud pops flatten, and the top is cut."""
    voiced = signal.lfilter(*signal.iirnotch(notch_hz, notch_q, fs=SR), dry)
    flat = voiced / (1 + np.abs(voiced / ceiling) ** hardness) ** (1 / hardness)
    return signal.sosfilt(signal.ellip(8, .2, 70, TOP_HZ, fs=SR, output="sos"), flat)


dry = scene()
out = record(dry)
transcribe(out)
```